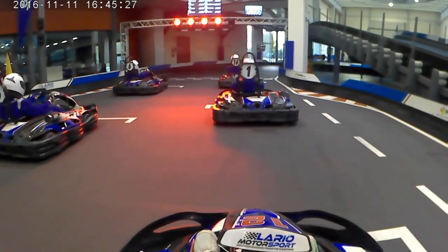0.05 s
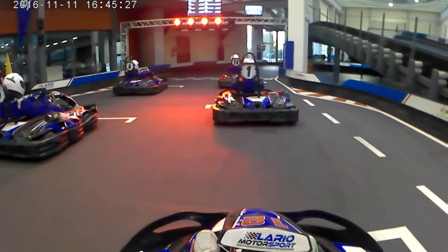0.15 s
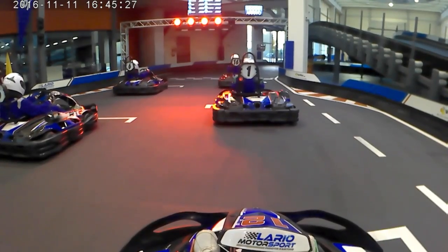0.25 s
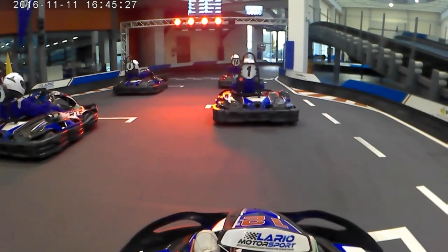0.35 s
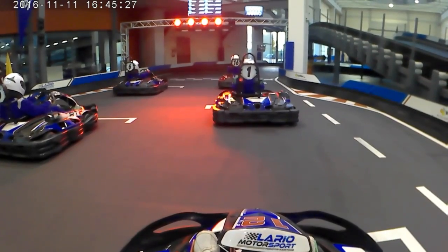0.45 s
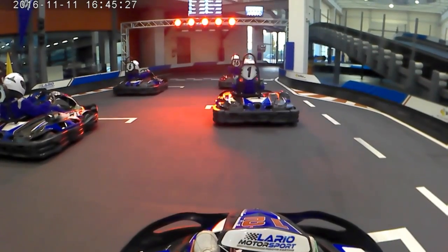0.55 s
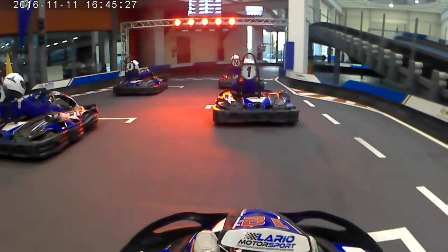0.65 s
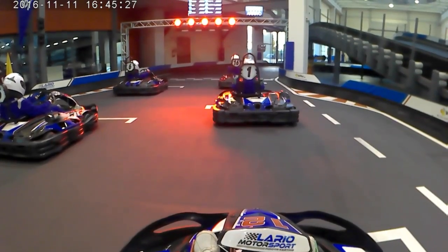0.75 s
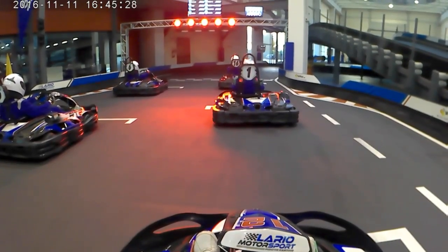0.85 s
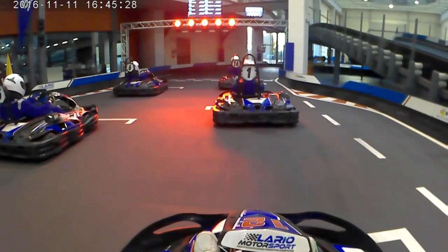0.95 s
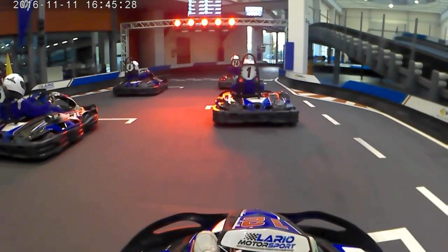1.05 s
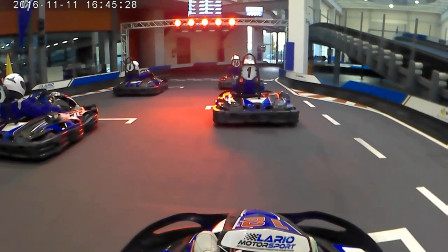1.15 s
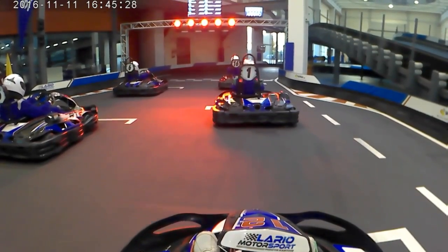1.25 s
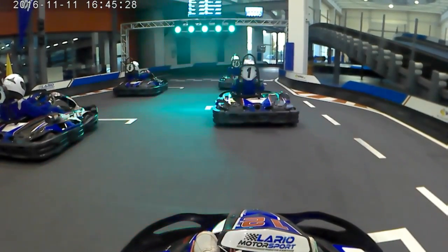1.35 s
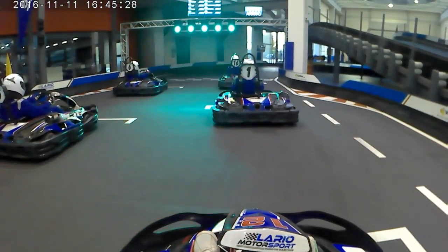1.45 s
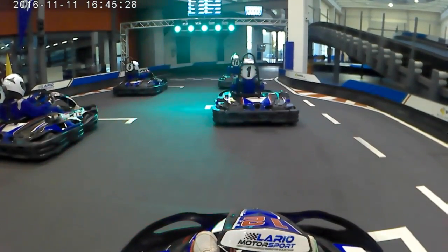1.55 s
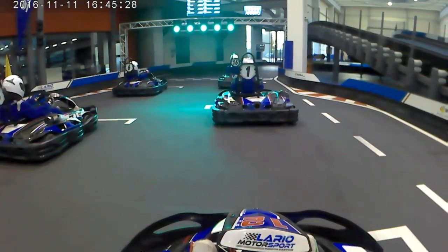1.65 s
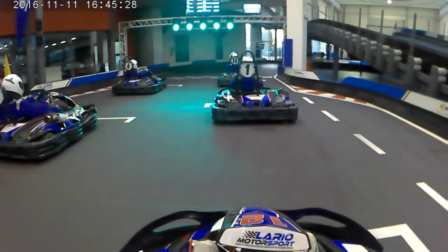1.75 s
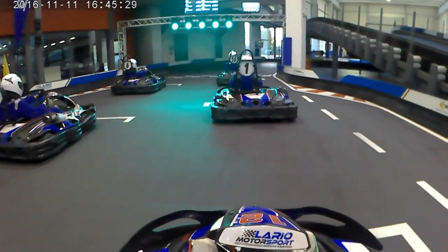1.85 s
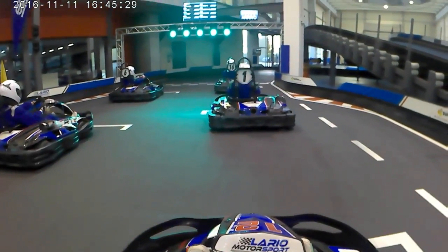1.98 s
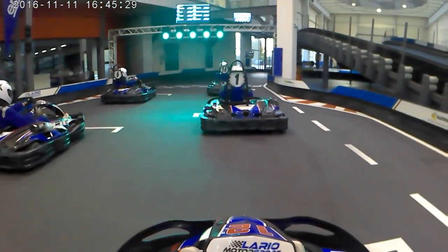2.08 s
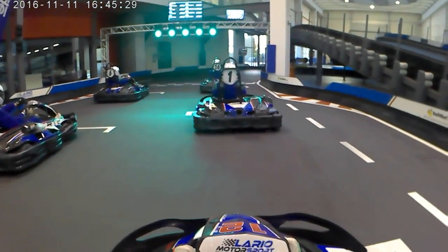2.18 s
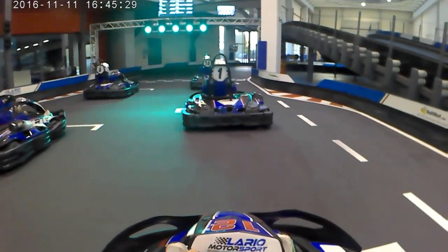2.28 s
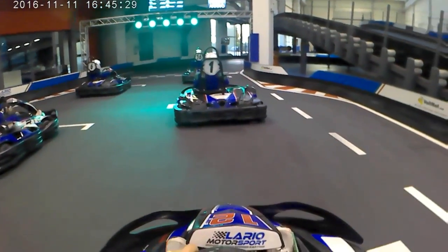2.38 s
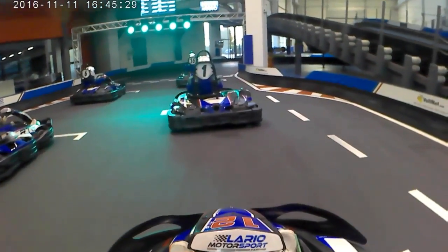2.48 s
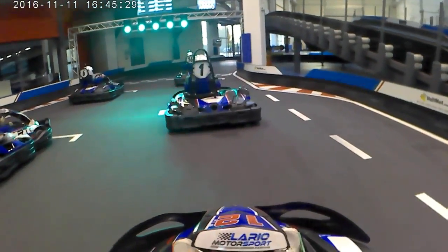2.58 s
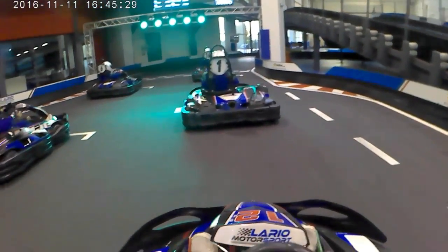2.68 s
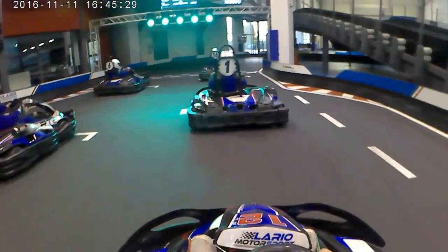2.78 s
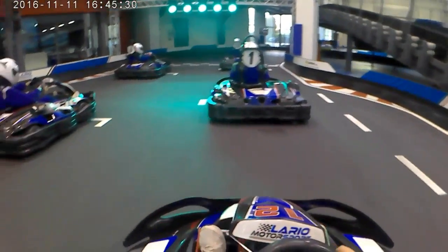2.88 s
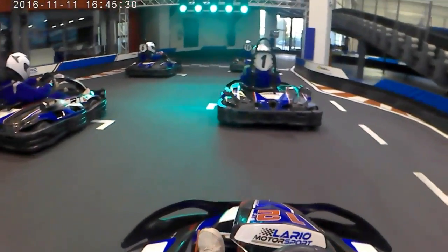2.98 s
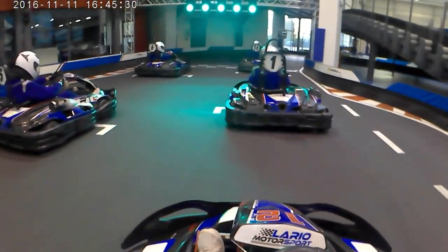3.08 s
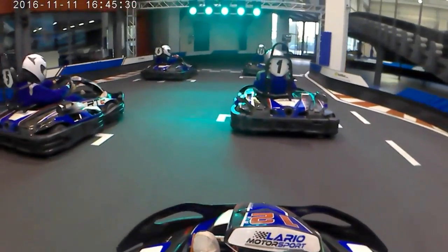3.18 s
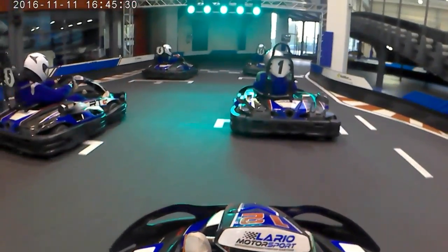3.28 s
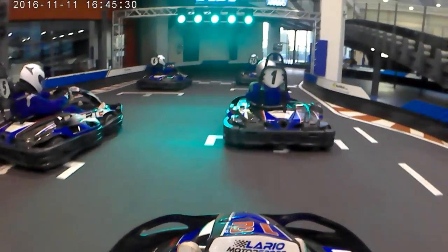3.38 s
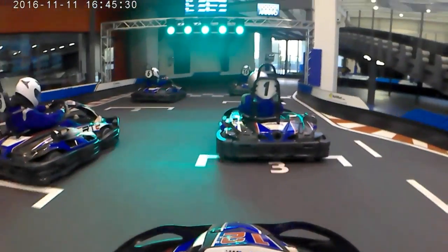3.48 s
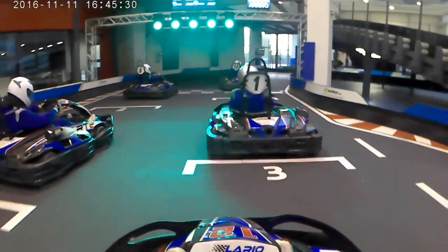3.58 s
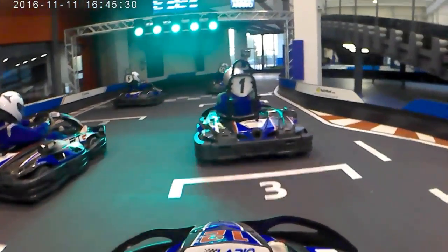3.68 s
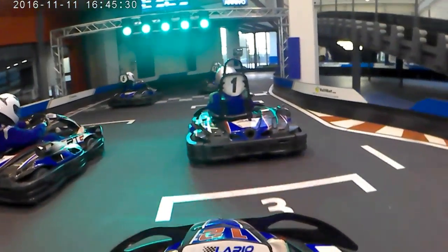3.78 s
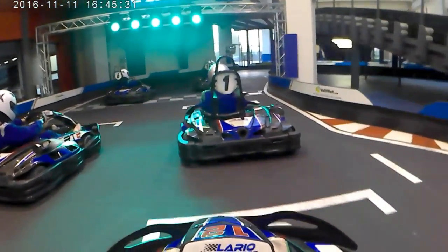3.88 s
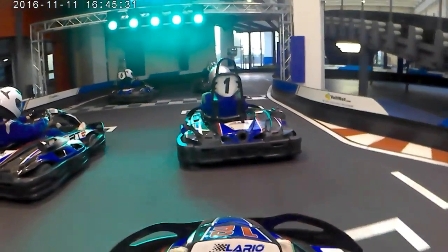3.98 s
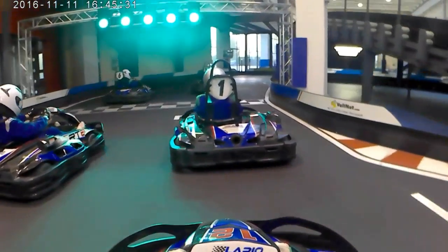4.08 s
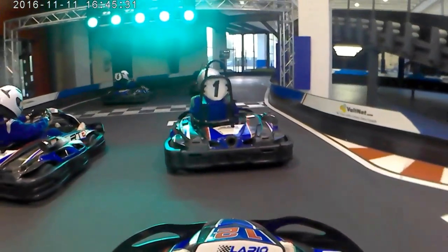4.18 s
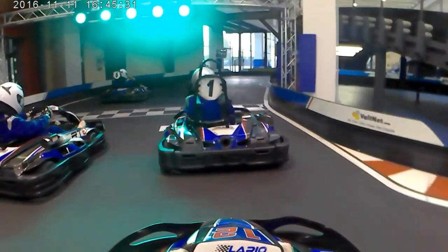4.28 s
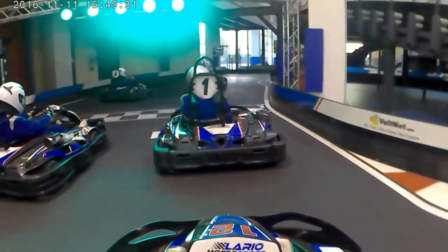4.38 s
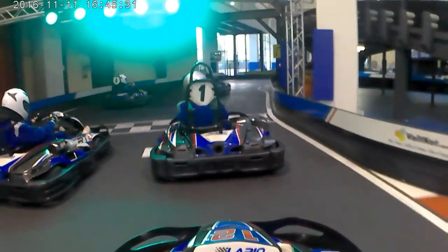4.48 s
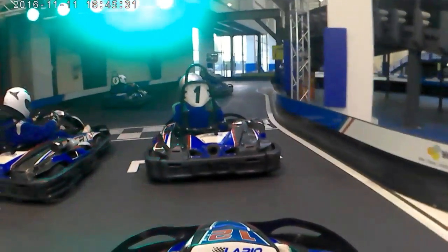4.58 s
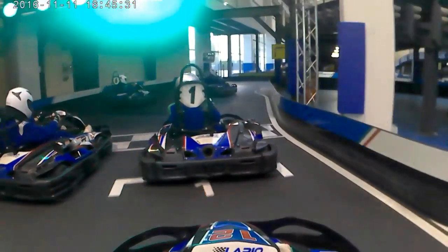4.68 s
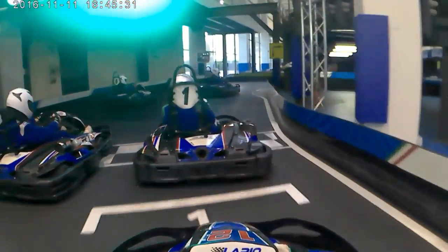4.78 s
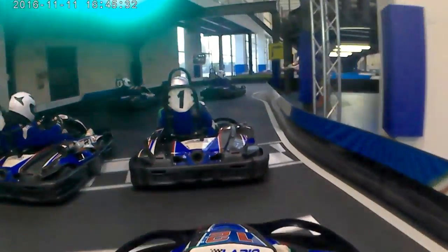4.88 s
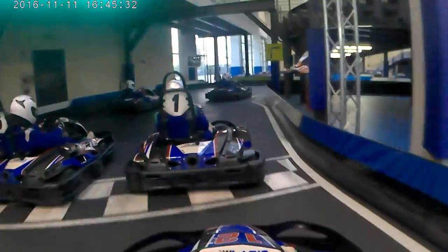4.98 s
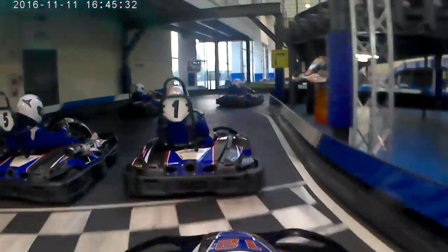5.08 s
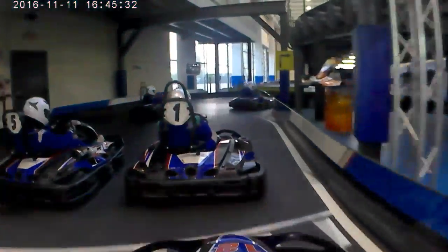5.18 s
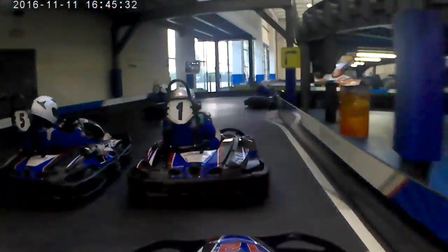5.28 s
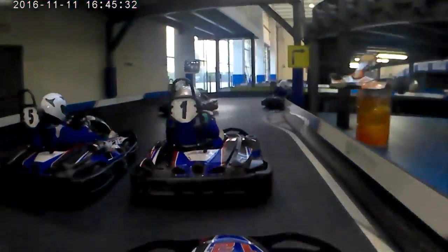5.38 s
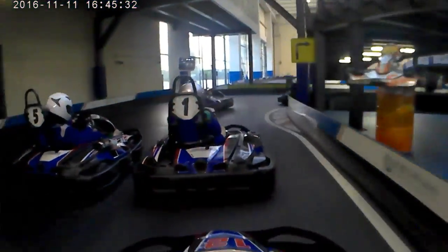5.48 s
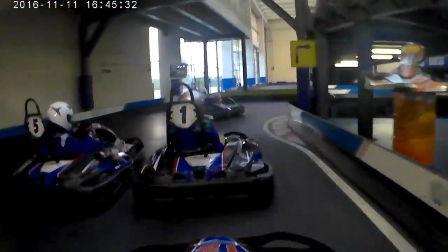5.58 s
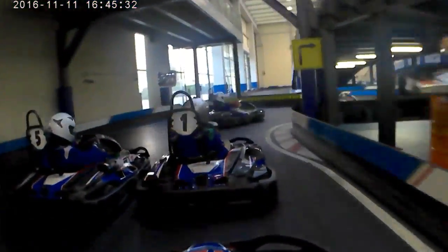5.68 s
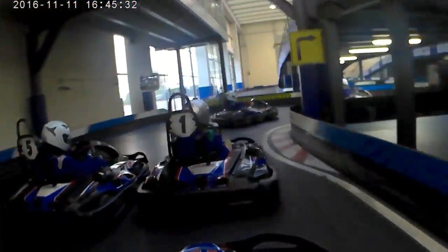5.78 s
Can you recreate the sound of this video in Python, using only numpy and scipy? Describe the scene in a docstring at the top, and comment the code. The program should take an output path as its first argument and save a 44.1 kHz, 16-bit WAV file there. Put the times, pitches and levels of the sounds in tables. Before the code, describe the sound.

Several go-karts idle with a soft clattering putter in an echoing hall, then rev up together and pull away in a loud, gritty drone.

```python
"""A single-cylinder four-stroke go-kart, heard from on board, idles on an indoor grid, then pulls away.
Click trains at the engine strokes ring filters for silencer, block and valve gear; sines shake the chassis.
A kart alongside and one ahead boom as wavering sines; five rivals run the same engine model through the hall.
The sound is sampled at a low rate and held, which adds a gritty, mirrored treble."""
import sys
import numpy as np
from scipy import signal
from scipy.fft import rfft, irfft
from scipy.io import wavfile

SR = 44100
rng = np.random.default_rng(int(sys.argv[2]) if len(sys.argv) > 2 else 0)


def persist_wave(psi):
    """Save psi, clipped to +-1, as 16-bit WAV."""
    counts = np.round(np.clip(psi, -1, 1) * 32767).astype(np.int16)
    wavfile.write(sys.argv[1], SR, np.atleast_2d(counts).T)


N = 257544


def amp(db):
    """Decibels to amplitude gain."""
    return 10 ** (np.asarray(db) / 20)


def evened(x):
    """Scales to rms 1."""
    return x / np.sqrt(np.mean(x ** 2) + 1e-20)


def curves(rows):
    """Each column after start_s, interpolated to one value per sample."""
    start_s, *columns = np.transpose(rows)
    t = np.arange(N) / SR
    return [np.interp(t, start_s, column) for column in columns]


def drift(per_s):
    """Slow random wander of rms 1, with per_s knots per second."""
    t = np.arange(N) / SR
    return evened(np.interp(t * per_s, np.arange(2048), rng.standard_normal(2048)))


def tone(hz, db):
    """A sine that follows a pitch curve and an rms level curve."""
    turns = np.cumsum(hz) / SR + rng.random()
    return np.sqrt(2) * amp(db) * np.sin(2 * np.pi * turns)


def colour(x, points, size=16384):
    """Minimum-phase filter with the given spectrum: it rings after a blow, never before."""
    hz, db = np.transpose(points)
    bins_hz = np.fft.rfftfreq(size, 1 / SR)
    gain_db = np.interp(np.log(bins_hz + 1), np.log(hz + 1), db)
    cepstrum = irfft(np.log(amp(gain_db)))
    cepstrum[1:size // 2] *= 2  # fold onto positive time
    cepstrum[size // 2 + 1:] = 0
    ring = irfft(np.exp(rfft(cepstrum)))[:size // 2]
    return signal.oaconvolve(x, ring)[:N]


# near engine: idle, rev-up, sag as the clutch bites, then steadier; columns: start_s, crank_hz
OWN_CRANK = [(0, 27.4), (1.2, 27.3), (1.85, 27.85), (2.2, 27.2), (2.44, 27.9), (2.59, 32.5), (2.75, 40.6),
             (3.15, 50.9), (3.3, 51.7), (3.63, 45), (3.8, 50.2), (4.0, 50), (4.25, 51.4), (5.04, 49.6),
             (5.5, 50.2), (5.84, 46.9)]


def own_crank_hz():
    """Crank speed of the near engine."""
    return curves(OWN_CRANK)[0]


# throttle of the scene; columns: start_s, opening (0 idle, 1 open)
THROTTLE_OPENING = [(2.46, 0), (2.58, 0.2), (2.8, 0.79), (3.3, 0.97)]


def throttle_opening():
    """Throttle per sample."""
    return curves(THROTTLE_OPENING)[0]


GO_S, BUILD_S = 2.45, .39  # pull-away time, time constant of the load


def pulling(idle_db, gain_db, db_per_s=0):
    """A level that rises quickly as the karts take up the load, then slowly as they gain speed."""
    driving_s = np.maximum(np.arange(N) / SR - GO_S, 0)
    return idle_db + gain_db * (1 - np.exp(-driving_s / BUILD_S)) + db_per_s * driving_s


def strokes(cycles, at, uneven_db):
    """One click per engine cycle at the given part of it, each of its own strength."""
    where = np.flatnonzero(np.diff(np.floor(cycles - at)) > 0)
    clicks = np.zeros(N)
    clicks[where] = amp(uneven_db * rng.standard_normal(1024)[:len(where)])
    return clicks


def puffs(clicks, decay_s):
    """A dying burst of gas noise after each click; decay_s is for power."""
    power = signal.lfilter([1], [1, -np.exp(-1 / (SR * decay_s))], clicks ** 2)
    return evened(np.sqrt(power) * rng.standard_normal(N))


def engine(crank_hz, hunting=.014, intake=0.37, pipe_rough=0.49, block_rough=1.0):
    """A four-stroke fires every second turn; returns drives of silencer, block and valve gear."""
    cycles = np.cumsum(crank_hz * (1 + hunting * drift(9))) / (2 * SR) + rng.random()
    steady = 1 / np.sqrt(crank_hz)  # keeps power equal at any speed
    firing = steady * strokes(cycles, 0, uneven_db=1.52)
    suction = steady * strokes(cycles, .5, uneven_db=1.6)
    taps = steady * (strokes(cycles, 0.12, uneven_db=0.0) + strokes(cycles, 0.26, uneven_db=2.2))
    pipe = evened(firing + intake * suction) + pipe_rough * puffs(firing, decay_s=0.022)
    block_gas = puffs(firing + 0.75 * suction, decay_s=0.016)
    block = evened(firing + 0.63 * suction) + block_rough * block_gas
    valves = puffs(firing + taps, decay_s=0.0076)
    return np.array([evened(pipe), evened(block), valves])


def scatter(x, spread_s, grain_hz=45):
    """Frame, seat and driver delay each band differently, so a blow arrives as a short rattle."""
    hz = np.fft.rfftfreq(N, 1 / SR)
    lateness = rng.random(1024) ** 2  # most bands early, a few trail
    delay_s = spread_s * np.interp(hz / grain_hz, np.arange(1024), lateness)
    phase = -2 * np.pi * np.cumsum(delay_s) * hz[1]
    return irfft(rfft(x) * np.exp(1j * phase), N)


def near_engine(load_db=-6):
    """The engine on board, scattered by the frame; silencer and block drives sink as throttle opens."""
    pipe, block, valves = engine(own_crank_hz(), hunting=.006, intake=0.51, pipe_rough=0.36,
                                 block_rough=1.15)
    rattle = scatter(np.array([pipe, block]), spread_s=.028)
    pipe, block = amp(load_db * throttle_opening()) * rattle
    return pipe, block, valves


def loaded(drive, idle, load, idle_db, load_db):
    """The throttle blends the idle colour into the colour under load."""
    throttle = np.clip(throttle_opening(), 0, 1)
    idling = amp(idle_db) * np.sqrt(1 - throttle) * evened(colour(drive, idle))
    pulling_hard = amp(load_db) * np.sqrt(throttle) * evened(colour(drive, load))
    return idling + pulling_hard


# silencer spectrum at idle and under load; columns: hz, relative_db
SILENCER_IDLE = [(38, -19), (65, -8), (113, -5.5), (134, -8.5), (150, -2.5), (177, -6.5), (211, 0.5),
                 (231, -3), (254, -22), (296, -12), (327, -17), (394, -15.5), (473, -23), (563, -18.5),
                 (750, -32), (980, -54), (1650, -120)]
SILENCER_LOAD = [(38, -31), (65, -8), (81, -16.5), (119, -15.5), (160, -3), (183, -1), (196, -5),
                 (256, -16), (314, -17), (355, -11.3), (432, -16.5), (508, -20.5), (569, -15.5),
                 (630, -22.5), (750, -31.5), (980, -58.5), (1650, -120)]


def exhaust(drive):
    """Gas pulses coloured by the silencers."""
    level_db = pulling(idle_db=-39.8, gain_db=16, db_per_s=.25)  # before the trims below
    return amp(level_db) * loaded(drive, SILENCER_IDLE, SILENCER_LOAD, idle_db=-.5, load_db=-1)


# ring of engine block and covers at idle and under load; columns: hz, relative_db
BLOCK_RING_IDLE = [(380, -33.5), (650, -11.5), (695, -11), (851, -7), (939, -6.5), (1180, -0.5), (1470, -9),
                   (1650, -6.5), (1750, -12.5), (1990, -5), (2170, -9.5), (2360, -19), (2640, -18.5),
                   (2870, -26), (3900, -31), (5070, -69), (8580, -120)]
BLOCK_RING_LOAD = [(380, -37), (650, -10), (842, -10), (1130, 0.2), (1330, -4.5), (1440, -8.5), (1720, -13),
                   (1880, -8.5), (2030, -6.5), (2390, -22.5), (2610, -18.5), (2820, -23.5), (3230, -21),
                   (3620, -34.5), (4000, -24), (5200, -66), (8800, -120)]


def clatter(drive):
    """Blows that ring engine blocks and covers."""
    level_db = pulling(idle_db=-40.6, gain_db=11.4, db_per_s=1.0)  # before the trims below
    return amp(level_db) * loaded(drive, BLOCK_RING_IDLE, BLOCK_RING_LOAD, idle_db=-1.25, load_db=0.5)


# valve gear spectrum; columns: hz, relative_db
VALVE_RING = [(1400, -29.5), (1780, -11), (1930, -1.5), (2130, -2.5), (2300, -21), (3000, -39), (4000, -57)]


def valve_gear(valves, idle_db=-51, load_db=4):
    """Ticking of the near engine's valves, louder as the throttle opens."""
    return amp(idle_db + load_db * throttle_opening()) * evened(colour(valves, VALVE_RING))


def karts(own_pipe_db=0, own_block_db=-3):
    """Near engine and rivals share silencer and block colours; under load the rivals take over."""
    pipe, block, valves = near_engine()
    far_pipe, far_block = field()
    gas = exhaust(amp(own_pipe_db) * pipe + far_pipe)
    blows = clatter(amp(own_block_db) * block + far_block)
    return gas + blows + valve_gear(valves)


# shake at crank speed; columns: start_s, level_db (before turn_db)
SHAKE_LEVEL = [(0, -29), (1.2, -33), (1.85, -26.5), (2.15, -31), (2.54, -28), (2.57, -18.5), (2.96, -19),
               (3.07, -29), (3.15, -21.5), (3.34, -29), (3.41, -14.5), (3.66, -22), (3.92, -11.5),
               (4.3, -22), (4.47, -19), (4.54, -27), (4.88, -29), (5.0, -19), (5.4, -26), (5.84, -20)]
# throb at firing rate; columns: start_s, level_db (before firing_db)
THROB_LEVEL = [(0, -43), (2.5, -38), (2.59, -23), (2.9, -25), (3.3, -37), (3.45, -28), (3.9, -22),
               (4.15, -30), (4.6, -30), (5.0, -18), (5.58, -31), (5.84, -21)]
# idle hum of the near engine; one column each: multiple of crank_hz; level_db
HUM_CRANK_MULTIPLES = [1.5, 2, 3, 8]
HUM_LEVEL_DB = [-44, -50.5, -53.5, -53.5]
# floor rumble spectrum; columns: hz, relative_db
RUMBLE_SPECTRUM = [(1, -27), (4, -11.5), (10, 0), (22, -6.5), (40, -6), (60, -13.5), (90, -30),
                   (200, -44.5)]


def chassis(turn_db=-.4, firing_db=-1, flutter_db=2.5):
    """The piston shakes the frame per turn and per firing; the floor rumbles through the tyres."""
    crank_hz = own_crank_hz()
    idling = 1 - np.clip(throttle_opening(), 0, 1)
    turn_flutter_db = (.7 + 1.3 * (1 - idling)) * drift(13)
    shake = tone(crank_hz, curves(SHAKE_LEVEL)[0] + turn_db + turn_flutter_db)
    throb = tone(crank_hz / 2, curves(THROB_LEVEL)[0] + firing_db + flutter_db * drift(9))
    hum = np.zeros(N)
    for multiple, level_db in zip(HUM_CRANK_MULTIPLES, HUM_LEVEL_DB):
        hum += idling * tone(multiple * crank_hz, level_db + 2.4 * drift(7.26))
    rumble_db = pulling(idle_db=-44, gain_db=19)
    rumble = amp(rumble_db) * evened(colour(rng.standard_normal(N), RUMBLE_SPECTRUM))
    return shake + throb + hum + rumble


BESIDE_START_S, BESIDE_END_S, BESIDE_FADE_S = 2.47, 3.3, .05
BESIDE_FROM_HZ, BESIDE_TO_HZ = 193, 213
BESIDE_NEAREST_S, BESIDE_NEAREST_DB = 3.04, -30
BESIDE_RISE_DB_PER_S, BESIDE_FALL_DB_PER_S = 16, 45


def beside(waver=.025, flutter_db=2.5):
    """The silencer of the kart alongside booms as it revs up, swells as it draws level, drops away."""
    t = np.arange(N) / SR
    hz = np.interp(t, [BESIDE_START_S, BESIDE_END_S], [BESIDE_FROM_HZ, BESIDE_TO_HZ])
    hz = hz * (1 + waver * drift(20))
    past_s = t - BESIDE_NEAREST_S
    slope_db = np.minimum(BESIDE_RISE_DB_PER_S * past_s, -BESIDE_FALL_DB_PER_S * past_s)
    edge_s = np.minimum(t - BESIDE_START_S, BESIDE_END_S - t)
    sounding = np.clip(edge_s / BESIDE_FADE_S, 0, 1)
    return sounding * tone(hz, BESIDE_NEAREST_DB + slope_db + flutter_db * drift(14))


# kart ahead; columns: start_s, crank_hz
AHEAD_CRANK = [(2.5, 28), (2.8, 38), (3.35, 44), (4.15, 44.6), (4.4, 48), (4.85, 46.8), (5.35, 45.8),
               (5.55, 47.2), (5.84, 45.3)]
# its silencer boom; columns: start_s, level_db (before boom_db and throttle)
AHEAD_BOOM = [(3.1, -44), (3.35, -32), (3.6, -31), (3.95, -23.5), (4.6, -32), (5.3, -27), (5.46, -19.5),
              (5.78, -30)]


def ahead(boom_db=-3, octave_db=-45, drone_db=-30, waver=.022, flutter_db=2.5):
    """The silencer ahead booms at 4x crank speed; a deep drone at 1x beats against the near engine."""
    crank_hz = curves(AHEAD_CRANK)[0]
    boom_hz = 4 * crank_hz * (1 + waver * drift(25))
    boom = tone(boom_hz, curves(AHEAD_BOOM)[0] + boom_db + flutter_db * drift(14))
    octave = tone(2 * boom_hz, octave_db + flutter_db * drift(14))
    drone = tone(crank_hz, drone_db)
    load_gain = amp(pulling(idle_db=-30, gain_db=30))
    return load_gain * (octave + drone) + throttle_opening() * boom


# rivals; columns: idle_hz (crank), start_s, rise_s (to clutch speed), clutch_hz (crank),
# gain_hz_per_s (after the clutch bites), level_db (relative)
RIVALS = [(26.57, 2.42, .9, 48, 3.5, -2), (28.935, 2.45, .8, 43, 2.5, 0), (25.0, 2.35, .5, 50, 3.5, -1),
          (31.4, 2.4, .45, 60, -1.5, -2), (24.1, 2.6, .8, 39, 2, -1)]


def field(direct_db=-5):
    """Rivals rev up until the clutch bites, then change speed slowly; heard mostly by way of the hall."""
    t, drives = np.arange(N) / SR, np.zeros((2, N))
    for idle_hz, start_s, rise_s, clutch_hz, gain_hz_per_s, level_db in RIVALS:
        revving = np.sin(np.pi / 2 * np.clip((t - start_s) / rise_s, 0, 1))
        clutched_s = np.maximum(t - start_s - rise_s, 0)
        crank_hz = idle_hz + (clutch_hz - idle_hz) * revving + gain_hz_per_s * clutched_s
        drives += amp(level_db) * engine(crank_hz)[:2]
    direct = amp(direct_db) * scatter(drives, spread_s=.03)
    return [evened(part) for part in direct + hall(drives)]


def hall(x, t60_s=1.25, first_echo_s=.012, echoes_per_s=2000):
    """Dense echoes from concrete walls and roof; three echo patterns keep cross-fading."""
    t, out = np.arange(SR) / SR, 0
    for turn in np.arange(3) / 3:
        present = (rng.random(SR) < echoes_per_s / SR) * (t > first_echo_s)
        tail = rng.choice([-1., 1.], SR) * present * amp(-60 * t / t60_s)
        # the three powers sum to 1
        share = np.sqrt(2 / 3) * np.cos(np.pi * (1.5 * np.arange(N) / SR + turn))
        out = out + irfft(rfft(x * share) * rfft(tail / np.linalg.norm(tail), N), N)
    return out


def scene():
    """Everything mixed together; a gentle high-pass removes any steady offset."""
    high_pass = signal.butter(1, 2, "high", fs=SR, output="sos")
    return signal.sosfilt(high_pass, karts() + chassis() + beside() + ahead())[None]


HELD_RATE_HZ, EDGE_HZ, STEPS = 8000, 15520, 12  # STEPS: copies per held sample


def record(dry):
    """Each slow sample is held until the next, mirroring sound around rate multiples; then low-pass."""
    slow = signal.resample_poly(dry, HELD_RATE_HZ, SR, axis=1, window=("kaiser", 3))
    stairs = np.repeat(slow, STEPS, axis=1)
    held = signal.resample_poly(stairs, SR, STEPS * HELD_RATE_HZ, axis=1)[:, :N]
    low_pass = signal.firwin(1023, EDGE_HZ, window=("kaiser", 9), fs=SR)
    return signal.oaconvolve(held, low_pass[None], "same")


dry = scene()
out = record(dry)
persist_wave(out)
```